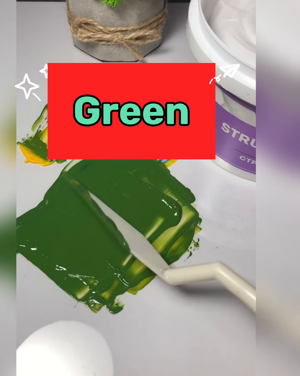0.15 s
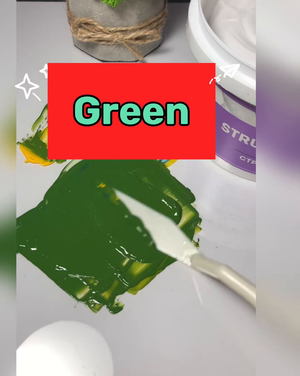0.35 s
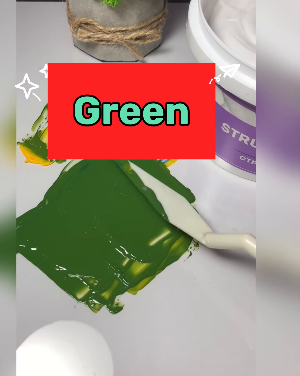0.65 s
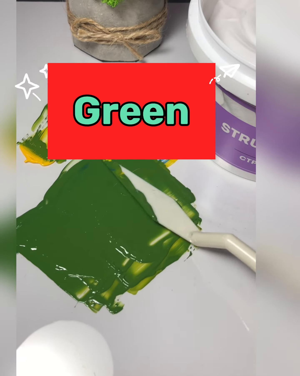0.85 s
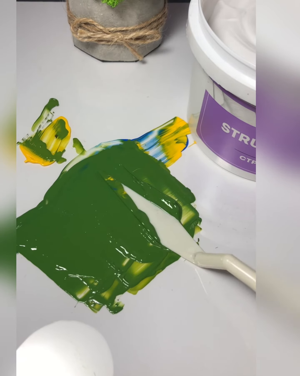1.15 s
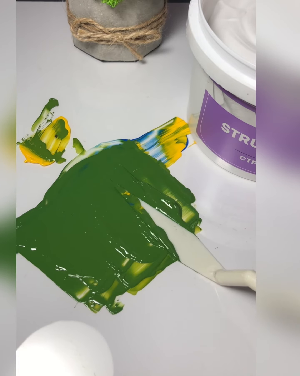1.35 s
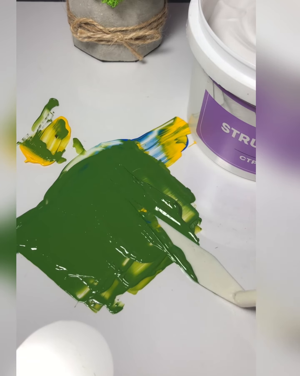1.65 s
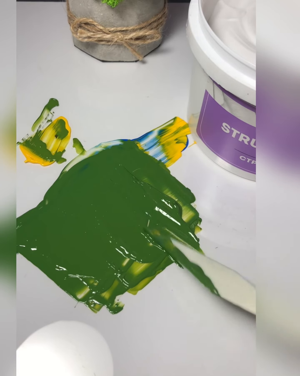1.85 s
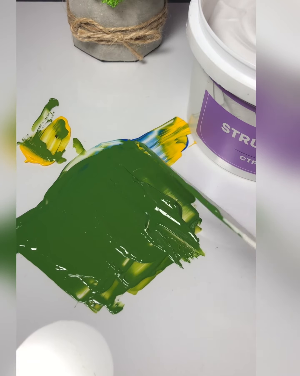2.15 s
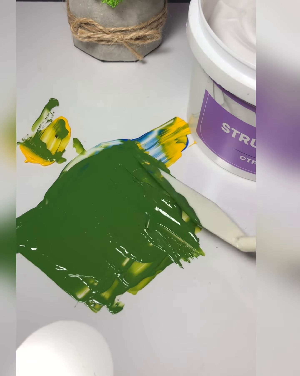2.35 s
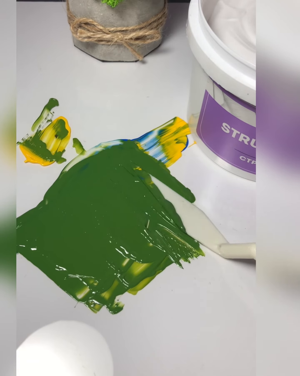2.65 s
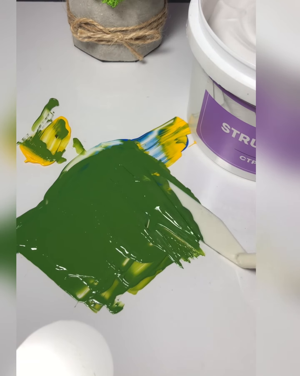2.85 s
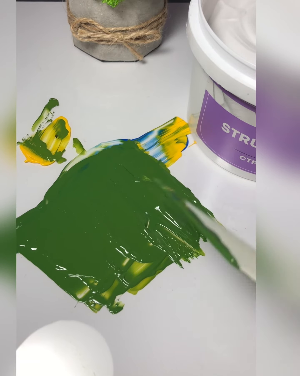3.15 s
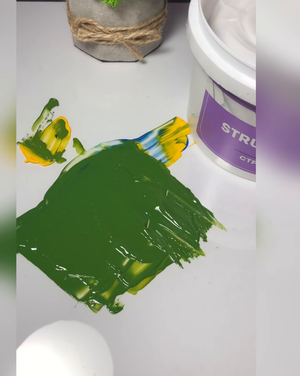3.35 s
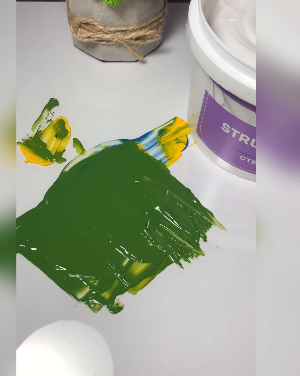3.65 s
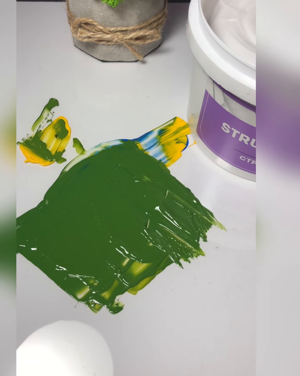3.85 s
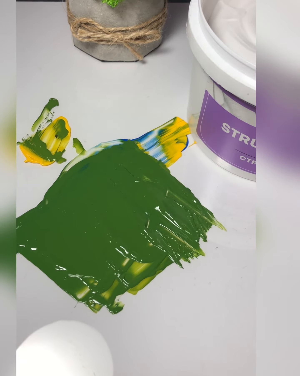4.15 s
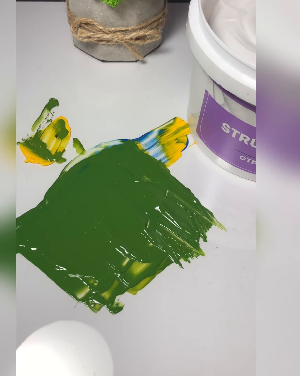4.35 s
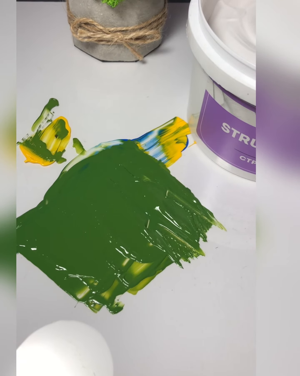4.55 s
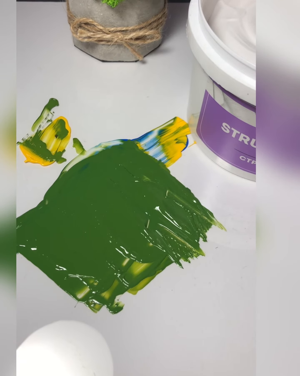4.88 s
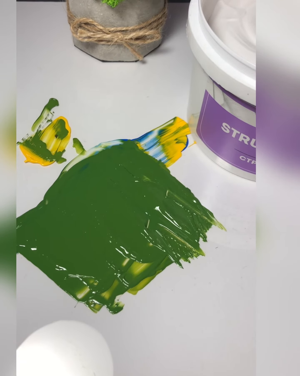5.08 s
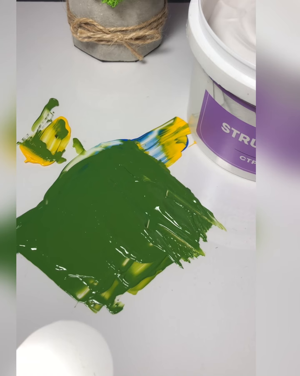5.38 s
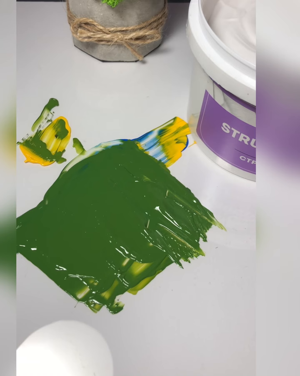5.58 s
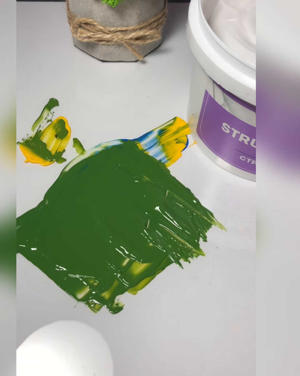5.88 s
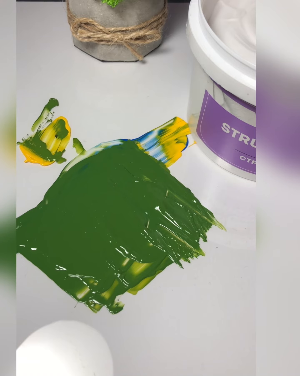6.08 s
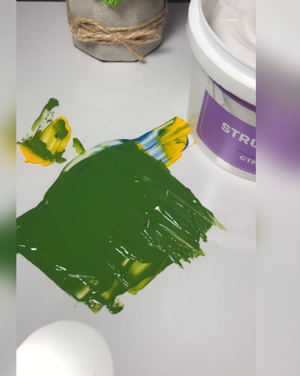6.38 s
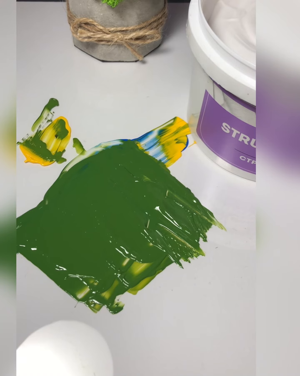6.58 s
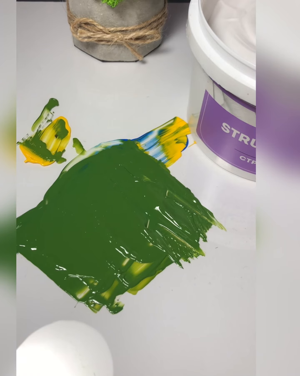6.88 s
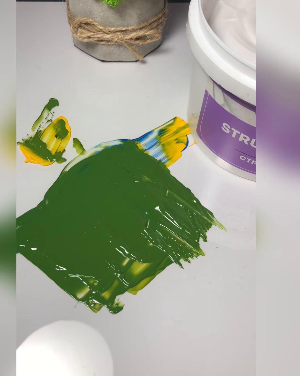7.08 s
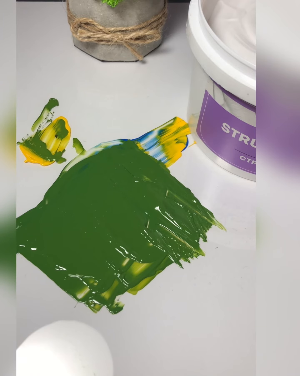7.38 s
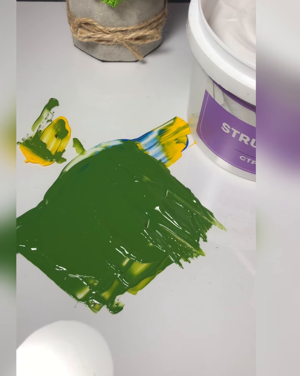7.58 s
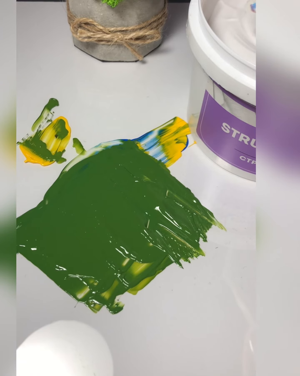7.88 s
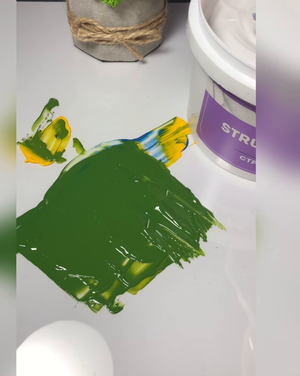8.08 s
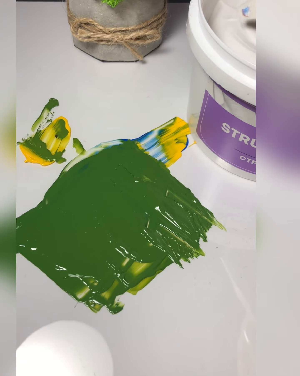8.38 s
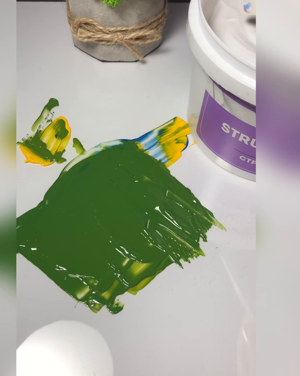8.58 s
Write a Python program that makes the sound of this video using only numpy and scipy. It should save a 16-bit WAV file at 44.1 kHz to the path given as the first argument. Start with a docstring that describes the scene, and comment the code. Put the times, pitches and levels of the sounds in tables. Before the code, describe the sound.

Soft, sticky scrapes of a plastic blade through thick paint, then a sharp double plastic clack, dull tub knocks and short shoves over low hum.

```python
"""A plastic palette knife smears thick paint over a tabletop: random grains coloured as blade and paint film.
Then something hard, probably a plastic paint tub, gives a sharp double clack of ringing modes and rattle.
It is knocked and shoved about on the table: short coloured blows, wall notes and rubbed resonances.
Behind lies a small room with a low, wavering hum: gliding overtones over bands of rumble and hiss."""
import sys
import numpy as np
from scipy import signal
from scipy.fft import rfft, irfft, next_fast_len
from scipy.io import wavfile
from scipy.ndimage import map_coordinates

SR = 44100
rng = np.random.default_rng(int(sys.argv[2]) if len(sys.argv) > 2 else 0)


def digitize_waveform(pressure):
    """Quantize a signal to 16-bit integers and store it at the path in sys.argv[1].

    Rows of a 2-D input are taken as channels; values are limited to [-1, 1].
    """
    field = np.atleast_2d(pressure).T
    bounded = np.clip(field, -1, 1)
    quanta = np.round(bounded * 32767).astype(np.int16)
    wavfile.write(sys.argv[1], SR, quanta)


N = 384983


def amp(db):
    """Decibels to gain."""
    return 10 ** (np.asarray(db) / 20)


def unit(x):
    """x at rms 1."""
    return x / np.sqrt(np.mean(x ** 2) + 1e-20)


def along(points, hz):
    """(Hz, value) points read on a log frequency axis."""
    f, v = np.transpose(points)
    return np.interp(np.log(hz + 1), np.log(f + 1), v)


def curves(rows):
    """One value per sample for each column after the time."""
    s, *cols = np.transpose(rows)
    return [np.interp(np.arange(N) / SR, s, c) for c in cols]


def wobble(rate):
    """A smooth random curve of rms 1, rate knots a second."""
    knots = rng.standard_normal(int(N * rate / SR) + 4)
    return unit(map_coordinates(knots, [np.arange(N) * rate / SR]))


def coloured(x, spectrum):
    """x through a (Hz, dB) spectrum, at rms 1."""
    m = next_fast_len(N + SR // 4)
    gain = amp(along(spectrum, np.fft.rfftfreq(m, 1 / SR)))
    return unit(irfft(rfft(x, m) * gain, m)[:N])


def noise(spectrum):
    """Smooth coloured noise of rms 1."""
    return coloured(rng.standard_normal(N), spectrum)


def grains(rate, spread_db):
    """Random tiny slips of uneven size, about rate a second, rms 1."""
    size_db = spread_db * rng.random(N)
    slips = rng.random(N) < rate / SR
    return unit(slips * rng.choice([-1, 1], N) * amp(size_db))


def blow(spectrum, tilt_db, chatter_db, chatter_t60, size=8192):
    """One contact of energy 1: a push and its fading chatter through a causal body colour."""
    t, hz = np.arange(size) / SR, np.fft.rfftfreq(size, 1 / SR)
    level = along(spectrum, hz) + tilt_db * np.log2(np.clip(hz, 500, 8000))
    # folding the cepstrum gives minimum phase: the body answers at once, with no pre-ring
    cepstrum = irfft(np.log(amp(level) + 1e-9))
    cepstrum[1:size // 2] *= 2
    cepstrum[size // 2 + 1:] = 0
    body_response = np.exp(rfft(cepstrum))
    chatter = rng.choice([-1, 1], size) * amp(-60 * t / chatter_t60)
    force = (t == 0) + amp(chatter_db) * chatter / np.linalg.norm(chatter)
    hit = irfft(rfft(force) * body_response)
    return hit / np.linalg.norm(hit)


def in_room(x, wet_db):
    """x followed by the walls' answer, each frequency dying at its own speed."""
    # Each row: frequency in Hz, time to fall by 60 dB in seconds.
    wall_decay = [(200, 0.41), (1000, .26), (2800, .3), (6000, 0.19), (14000, .14)]
    hz, t, z = signal.stft(rng.standard_normal(SR // 2), SR, nperseg=256)
    fade = amp(-60 * t / along(wall_decay, hz)[:, None])
    tail = signal.istft(z * fade, SR, nperseg=256)[1]
    response = np.pad(amp(wet_db) * tail / np.linalg.norm(tail), (SR // 200, 0))  # walls answer after 5 ms
    response[0] = 1
    return signal.fftconvolve(x, response)


def add(track, s, sound):
    """Mix a sound into the track at s seconds."""
    part = track[round(s * SR):][:len(sound)]
    part += sound[:len(part)]


def gesture(length, attack_s, release_s):
    """Seconds into one hand movement, and its gain: attack, hold, release."""
    t = np.arange(SR // 2) / SR
    return t, np.minimum(t / attack_s, 1) * np.exp(-np.maximum(t - length, 0) / release_s)


def knife():
    """The blade drags through the paste, and the film behind it tears in countless tiny pops."""
    # Knife strokes. Each row: start in seconds, length in seconds, then the levels that the swell
    # reaches before the lift: dragging blade in dB, tearing paint film in dB.
    strokes = [(0.337, 0.089, -77.5, -72), (.95, 0.079, -77.5, -85), (1.293, 0.12, -79, -87),
               (1.55, 0.16, -69, -66), (1.707, 0.096, -64.5, -56), (1.814, 0.028, -76, -70),
               (2.795, .07, -70, -79), (2.869, 0.18, -64, -54), (3.228, 0.0523, -72.5, -74),
               (3.76, .075, -79, -79), (7.33, 0.097, -78, -76.5), (7.459, 0.16, -83, -82)]
    # Colour of the dragging blade. Each row: frequency in Hz, relative level in dB per Hz.
    blade_colour = [(900, -9), (2300, -8.5), (3100, -6), (3650, 1.5), (4150, -10), (4900, -4.5), (5400, -1),
                    (6000, -12.5), (8000, -6.5), (11000, -20.5)]
    # Colour of the tearing film. Each row: frequency in Hz, relative level in dB per Hz.
    film_colour = [(4500, -18), (7500, -11), (9300, -4.5), (9900, -2.5), (10700, -3), (11800, 0),
                   (13200, -5), (15800, -7.5)]
    # Sticky paint ticks. Each row: start in seconds, nominal peak in dB, treble tilt in dB per octave.
    ticks = [(0.343, -54, -3), (.428, -56, -4), (1.7425, -39, 3), (1.752, -47, -6), (1.76, -47, 4),
             (1.825, -51, -2), (1.837, -47, -7), (2.56, -60, 2), (2.6856, -34.5, 7), (3.009, -40.5, -6)]
    # the paint thins along a stroke, so it tears ever louder
    blade_swell_db_per_s, film_swell_db_per_s = 80, 191
    attack_s, lift_s = 0.0082, 0.0029
    peel_s = 0.035  # the swell holds for this last part of a stroke, while the blade peels off

    drag, tear = np.zeros((2, N))
    for s, length, blade_db, film_db in strokes:
        t, contact = gesture(length, attack_s, lift_s)
        until_peel = np.maximum(length - peel_s - t, 0)
        add(drag, s, contact * amp(blade_db - blade_swell_db_per_s * until_peel))
        add(tear, s, contact * amp(film_db - film_swell_db_per_s * until_peel))
    grip = unit(amp(0.54 * wobble(170)))  # the paste catches and lets go
    rub = drag * coloured(grains(rate=3000, spread_db=8), blade_colour)
    fizz = tear * coloured(grains(rate=3500, spread_db=15.5), film_colour)
    out = grip * (rub + fizz)
    pop = [(800, -27), (2500, -14), (4400, 9.5), (6000, 3.5), (11000, 5.5), (15500, 6.5)]  # (Hz, dB)
    for s, db, tilt_db in ticks:
        add(out, s, amp(db + 8.5) * blow(pop, tilt_db, chatter_db=12, chatter_t60=0.0058))
    return in_room(out, wet_db=-14.0)[:N]


def clacks():
    """Hard plastic snaps twice amid lighter touches; its wall rings and rattles and the room answers."""
    # A light touch, the double clack, small rebounds and a later bump. Each row: start in seconds,
    # nominal peak in dB, treble tilt in dB per octave, wall rattle in dB relative to the ring.
    clack_hits = [(5.2714, -46.5, -2.5, 6.5), (5.286, -8.5, -1, -8.5), (5.2992, -30.5, -1, -1.5),
                  (5.3188, -11.5, 2, -3.5), (5.3278, -24, 1, -5), (5.336, -26.5, -1, -6),
                  (6.562, -30, -3, -0.5)]
    # The tub's modes, broad ones first, then the narrow ones that ring on.
    # Each row: frequency in Hz, level in dB before the tilt, time to fall by 60 dB in seconds.
    tub_modes = [(810, -9, 0.017), (1330, -4.5, 0.023), (1590, -11.5, 0.054), (2050, -6, .007),
                 (2640, -0.5, 0.015), (3088, -2.5, 0.011), (3580, 3, 0.0087), (5000, 2, 0.0061),
                 (5200, 0.5, .006), (7000, -7.5, .004), (8150, -13, 0.0048), (9400, -18, 0.005),
                 (11500, -23, .003), (15000, -33, .003), (873, -19, 0.16), (1296, -25, .13),
                 (1500, -27.5, .12), (1810, -31.5, .17), (2688, -24.5, 0.21), (2950, -29.5, 0.33),
                 (3410, -31, .16), (3820, -29.5, .17)]
    # Colour of the rattling wall. Each row: frequency in Hz, relative level in dB per Hz.
    rattle_colour = [(120, -16.5), (350, -5.5), (520, -5.5), (850, 3.5), (1100, 1.5), (1400, 3.5),
                     (2100, -1.5), (2700, 3.5), (3700, -1), (4400, -3.5), (5400, -3), (6500, -14),
                     (9000, -22.5), (15800, -39.5)]

    out, t = np.zeros(N), np.arange(8192) / SR
    for s, db, tilt_db, rattle_db in clack_hits:
        ring = np.zeros(len(t))
        for k, (hz, level, t60) in enumerate(tub_modes):
            swing = (-1) ** k  # neighbouring modes swing in opposite directions
            decay = amp(level + tilt_db * np.log2(hz) - 60 * t / t60)
            ring += swing * decay * np.sin(2 * np.pi * hz * t)
        rattle = blow(rattle_colour, tilt_db, chatter_db=22.5, chatter_t60=0.04)
        # the rattling wall radiates all round, so it stirs the room most
        ring_in_room = in_room(ring / np.linalg.norm(ring), wet_db=-24.5)
        rattle_in_room = in_room(rattle, wet_db=-9)
        add(out, s, amp(db + 14.5) * (ring_in_room + amp(rattle_db) * rattle_in_room))
    return out


def handling():
    """Light taps on plastic, and duller knocks that sound short notes in the tub's wall."""
    # Light taps. Each row: start in seconds, nominal peak in dB.
    taps = [(4.8459, -36.5), (5.025, -39.5), (5.9569, -55.5), (6.3245, -38), (6.4303, -48)]
    # Dull knocks of the tub on the table.
    # Each row: start in seconds, nominal peak in dB, treble tilt in dB per octave.
    knocks = [(5.492, -53, 1), (5.611, -44, -1), (5.8497, -32, -1.5), (5.905, -42, -1), (6.285, -44.5, 6.5),
              (6.5132, -35, 0), (6.542, -34, -0.5), (6.554, -32, 0), (6.572, -31.5, -4), (6.765, -47, -7.5),
              (6.775, -49, 6), (6.7995, -39.5, 0)]
    # Colour of a knock. Each row: frequency in Hz, relative level in dB per Hz.
    knock_colour = [(120, -13), (330, -5), (540, -7), (750, 8), (1000, 1.5), (1450, 7), (2150, -9),
                    (2700, -7), (3200, -17), (3900, -10), (4600, -26), (7000, -26), (14000, -49.5)]
    # What a knock sounds in the tub's wall. Each row: centre pitch in Hz, energy in dB relative to the blow.
    wall_notes = [(760, -2.5), (1040, -15), (1350, -7.5), (1600, -13.5)]
    note_t60_s, detune = 0.1, 0.018  # detune: random pitch spread as a fraction

    out, t = np.zeros(N), np.arange(8192) / SR
    tap_colour = [(300, -36), (900, 13), (2000, -9.0), (4500, 1.5), (8000, -5.5), (15000, -21)]  # (Hz, dB)
    for s, db in taps:
        tap = blow(tap_colour, tilt_db=2, chatter_db=9.5, chatter_t60=0.022)
        add(out, s, amp(db + 6) * in_room(tap, wet_db=-9))
    for s, db, tilt_db in knocks:
        knock = blow(knock_colour, tilt_db, chatter_db=1.0, chatter_t60=0.045)
        for hz, note_db in wall_notes:
            note_hz = hz * (1 + detune * rng.standard_normal())
            note = np.sin(2 * np.pi * note_hz * t) * amp(-60 * t / note_t60_s)
            knock = knock + amp(note_db) * note / np.linalg.norm(note)
        add(out, s, amp(db + 13.5) * in_room(knock, wet_db=-14))
    return out


def rubbed(hz, blur_hz):
    """A rubbed resonance is a fuzzy line at rms 1: its pitch and strength tremble."""
    strength = amp(0.94 * wobble(120))
    phase = 2 * np.pi * np.cumsum(hz + blur_hz * wobble(260)) / SR
    return unit(strength * np.sin(phase))


def sliding():
    """The tub's foot stutters over the table and sounds the hollow body."""
    # Shoves of the tub. Each row: start in seconds, length in seconds, then the drive before slowing and
    # layer trims: table in dB, hollow body in dB, rasp in dB; last the starting body resonance in Hz.
    shoves = [(5.478, 0.037, -75, -54, -73, 900), (5.54, 0.051, -61, -54.5, -73, 772),
              (5.61, 0.089, -52, -58.5, -73.5, 850), (5.825, 0.049, -48.5, -44.5, -70, 770),
              (5.897, 0.042, -53, -56, -77, 718.6), (6.28, .028, -47.5, -42, -67, 717),
              (6.315, 0.029, -50, -53.5, -61, 735.4), (6.376, 0.0591, -69, -45, -65, 900),
              (6.506, .077, -52, -42, -57.5, 1025), (6.757, .035, -54, -53.5, -67, 819),
              (6.792, 0.096, -61, -45.5, -67, 841.5), (6.895, .042, -64.5, -53, -73, 764)]
    # Colour of the scraped tub body. Each row: frequency in Hz, relative level in dB per Hz.
    body_colour = [(400, -20), (620, -0.5), (880, -3), (1130, 1), (1380, 6), (1720, -3), (2100, -10),
                   (3000, -38)]
    # Colour of the gritty rasp. Each row: frequency in Hz, relative level in dB per Hz.
    rasp_colour = [(1500, -28), (2500, 1.5), (3200, -2.5), (3900, -2), (5500, -7.5), (8000, -15),
                   (15000, -34)]
    # Colour of the table. Each row: frequency in Hz, relative level in dB per Hz.
    table_colour = [(150, -13), (280, -2), (380, 2.5), (520, -12.5), (800, -59)]
    attack_s, stop_s = 0.0165, 0.0057
    # a shove loses speed: it gets softer and its resonance sinks
    slowing_db_per_s, sag_hz_per_s = 78, 700

    t = np.arange(N) / SR
    table, body, rasp, pitch = np.zeros((4, N))
    for s, length, table_db, body_db, rasp_db, hz in shoves:
        age, contact = gesture(length, attack_s, stop_s)
        speed = contact * amp(-slowing_db_per_s * age)
        for track, db in (table, table_db), (body, body_db), (rasp, rasp_db):
            add(track, s, amp(db) * speed)
        pitch = np.where(t < s, pitch, hz - sag_hz_per_s * np.minimum(t - s, length))
    stutter = unit(amp(1.65 * wobble(160)))
    hollow = amp(-4.0) * rubbed(pitch, blur_hz=67.6) + amp(-18.5) * rubbed(2 * pitch, blur_hz=130.2)
    shell = amp(-10) * coloured(grains(rate=1600, spread_db=3.5), body_colour) + hollow
    grit = amp(-2) * coloured(grains(rate=2100, spread_db=13), rasp_colour)
    thud = amp(-1) * noise(table_colour)
    return in_room(stutter * (body * shell + rasp * grit + table * thud), wet_db=-12.0)[:N]


def drone():
    """A low drone like a far engine: overtones locked to one gliding, trembling pitch."""
    # It pulls, changes gear and dies away. Each row: time in seconds, centre pitch in Hz.
    drone_pitch = [(0, 98.5), (.5, 101.7), (1.1, 100.9), (1.7, 104), (2.3, 106), (3.2, 113.2), (3.6, 89.7),
                   (4.3, 91.76), (5.5, 94.8), (6.6, 93.2), (7.7, 77.67), (8.7, 80.4)]
    # Its loudness, with brief dips. Each row: time in seconds, level in dB before the flutter.
    drone_level = [(0.0, -56.5), (0.36, -54), (1.43, -58), (1.55, -53), (1.87, -59), (1.91, -68),
                   (2.05, -54.5), (2.69, -64), (3.58, -66.5), (3.67, -56.5), (5.88, -68.5), (5.97, -61),
                   (6.13, -71), (6.4, -61), (6.8, -71), (8.73, -74)]
    # Its partials. Each row: multiple of the pitch, relative level in dB.
    partials = [(.5, -19.5), (.75, -13), (1, 2.5), (1.5, -14), (2, -13.5)]
    (pitch,), (level_db,) = curves(drone_pitch), curves(drone_level)
    phase = 2 * np.pi * np.cumsum(pitch + 1.1 * wobble(9.8)) / SR
    tone = unit(sum(amp(db) * np.sin(k * phase) for k, db in partials))
    return amp(level_db + 0.74 * wobble(14)) * tone


def background():
    """Noise bands beside the drone: a narrow room resonance, rumble, and air and hiss on top."""
    # The room's low resonance. Each row: time in seconds, level in dB before a 2.5 dB lift.
    resonance_level = [(0.0, -68), (1.22, -73), (1.63, -64.5), (2.84, -67), (6.22, -67), (7.05, -63.5),
                       (7.61, -71), (8.0, -66), (8.73, -72.5)]
    # Colour of the rumble. Each row: frequency in Hz, relative level in dB per Hz.
    rumble_colour = [(15, -39), (28, -12), (48, -4.5), (61, -5.5), (76, -6), (135, -1.5), (165, -4.5),
                     (230, -4), (268, -16.5), (296, 0.5), (320, -10.5), (430, -15), (800, -32.5),
                     (1700, -81)]
    # Colour of the air noise. Each row: frequency in Hz, relative level in dB per Hz.
    air_colour = [(290, -24), (500, 1.5), (553, -9), (595, -3.5), (697, -8), (749, -6), (817, -9.5),
                  (1160, -10.5), (1590, -16.5), (2280, -13), (3180, -19), (8860, -27.5), (15800, -39.5)]
    rumble_db, air_db = -62.5, -74.5  # levels away from the swell
    swell_peak_db, swell_middle_s, swell_width_s = 2.5, 3.3, 2.1

    # the outside noise rises and falls once
    swell_db = swell_peak_db * np.exp(-((np.arange(N) / SR - swell_middle_s) / swell_width_s) ** 2)
    (upper_db,) = curves(resonance_level)
    hum = drone()
    upper = amp(upper_db + 2.5) * noise([(150, -55.5), (200, -15.5), (218, 4), (238, -9), (300, -57.0)])
    rumble = amp(rumble_db + 0.66 * swell_db + 1.1 * wobble(8.9)) * noise(rumble_colour)
    air = amp(air_db + swell_db) * noise(air_colour)
    hiss = amp(-79) * noise([(500, -6), (4000, 0.0), (14000, -1.5), (15800, -7.5)])
    return hum + upper + rumble + air + hiss


def scene():
    """Everything at one microphone."""
    return (knife() + clacks() + handling() + sliding() + background())[None]


def record(dry):
    """Rounds off the highest peaks and keeps nothing above the band limit."""
    ceiling, top_hz = 0.36, 15800
    rounded = dry / (1 + np.abs(dry / ceiling) ** 6) ** (1 / 6)
    m = next_fast_len(N + SR // 4)
    in_band = np.fft.rfftfreq(m, 1 / SR) < top_hz
    return irfft(rfft(rounded, m) * in_band, m)[..., :N]


dry = scene()
out = record(dry)
digitize_waveform(out)
```